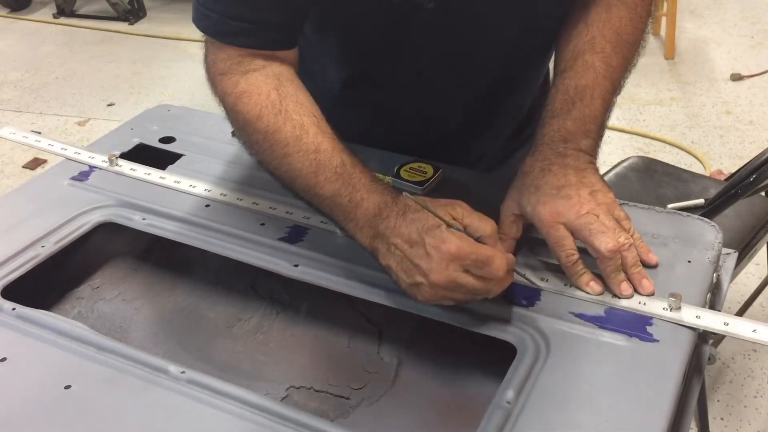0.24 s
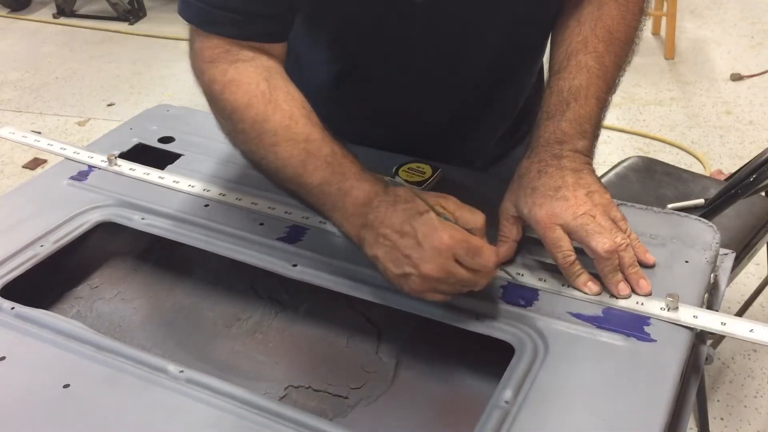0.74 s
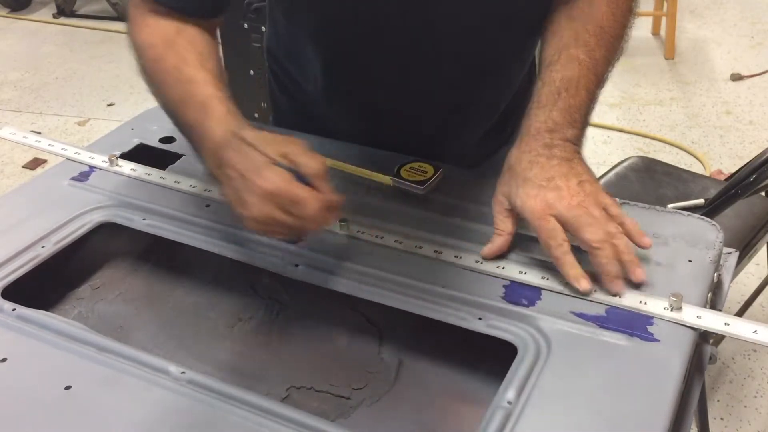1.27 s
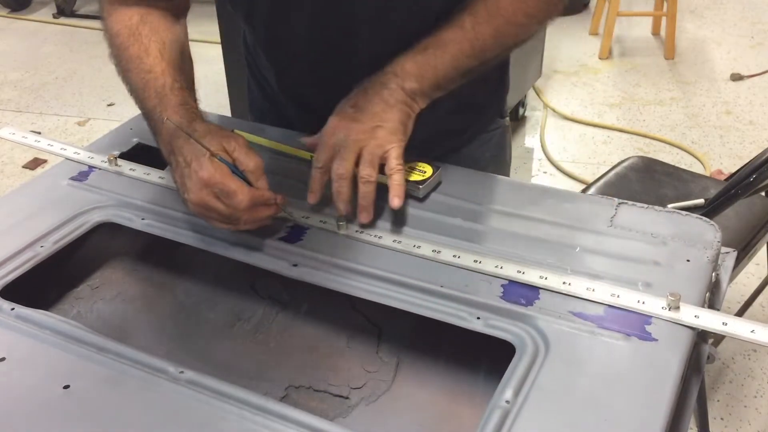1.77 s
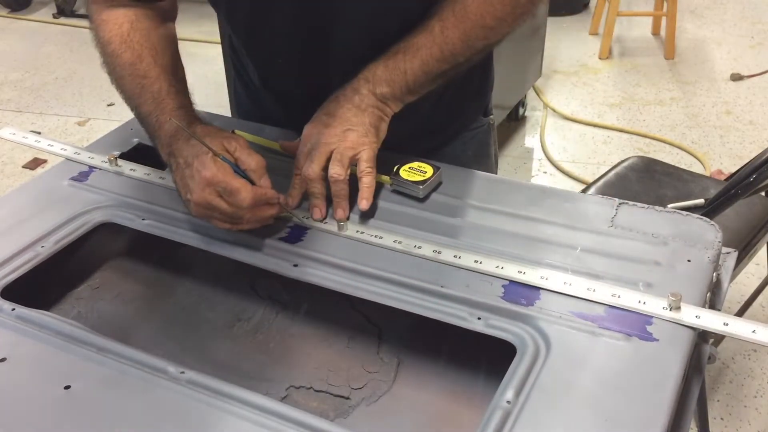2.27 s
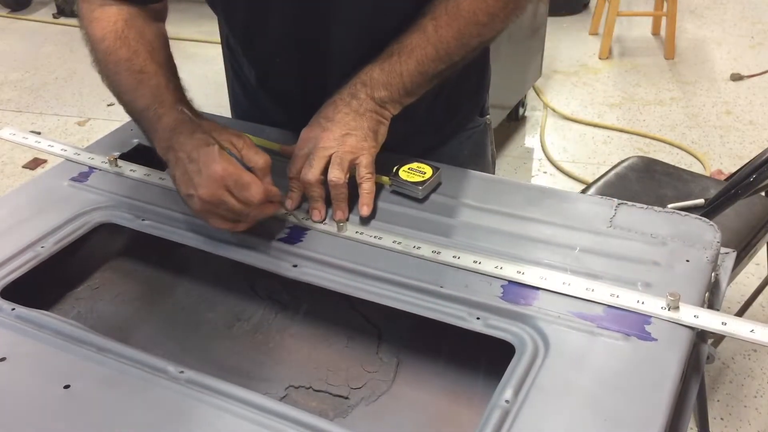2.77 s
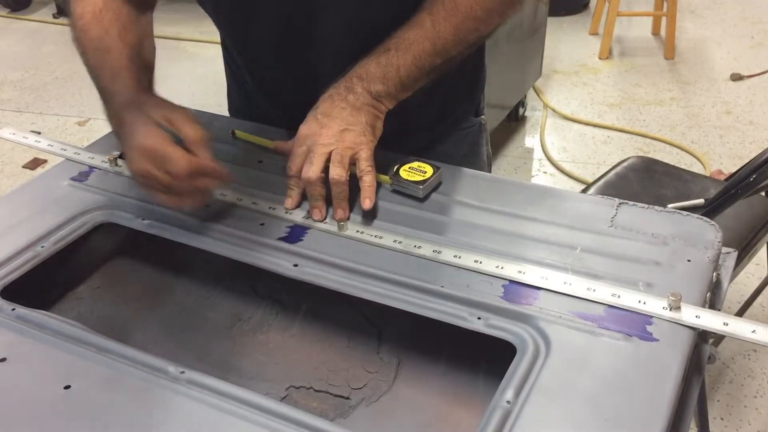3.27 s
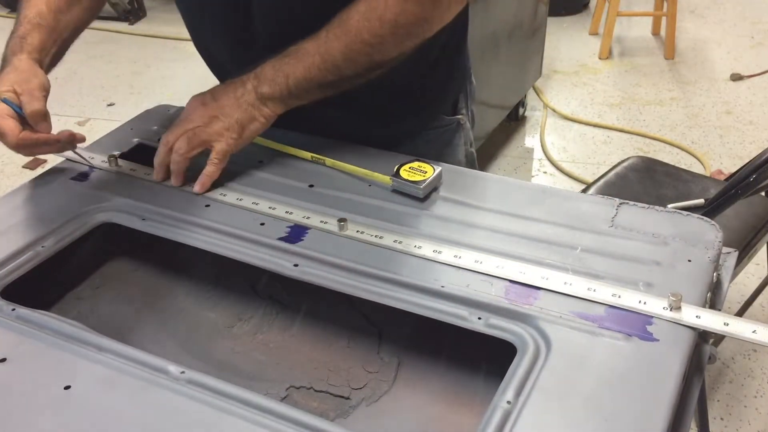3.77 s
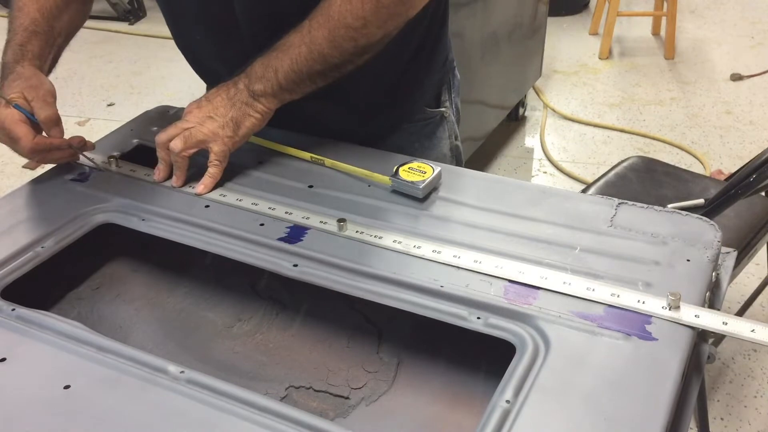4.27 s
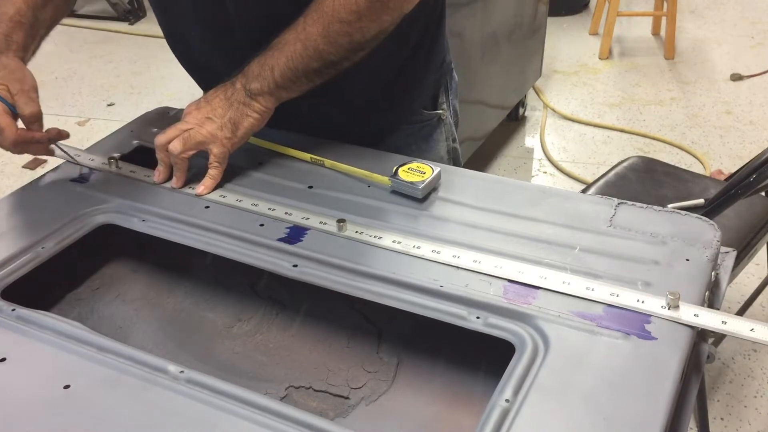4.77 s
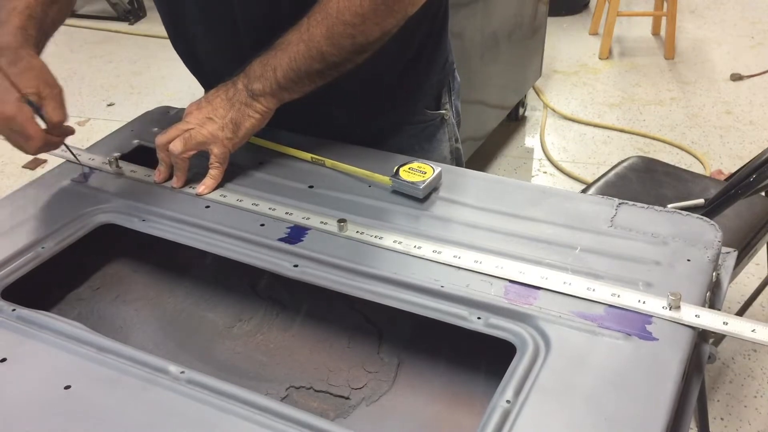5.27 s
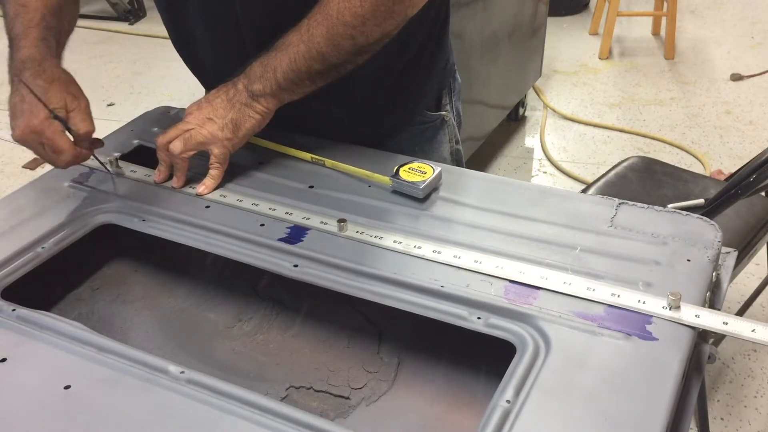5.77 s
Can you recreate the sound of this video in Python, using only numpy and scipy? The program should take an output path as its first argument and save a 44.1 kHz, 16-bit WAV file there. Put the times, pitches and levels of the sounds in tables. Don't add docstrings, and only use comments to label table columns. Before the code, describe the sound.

Close up in a small, quiet workshop, low rumble, faint mains hum and soft air noise run throughout. A tiny dry click comes at the very start, then a faint hand settling near 0.3 s. From 0.67 to 1.15 s a steel tip scrapes along sheet metal, gritty and hollow, rising to a rough peak near 0.85 and thinning out. Small taps follow at 1.3, 1.6 and 2.0 s, with a hand shuffle and light rings to 2.35. A second scrape starts abruptly at 2.82, fading in uneven scratches with low flexing thuds until a firm tap at 3.24. Near-quiet follows, then ringing taps and a shift at 4.0-4.2. A longer, stronger grind swells from 4.58 to 4.92 and stops sharply. At 5.26 the hardest knock rings the panel, leading into quick lighter scratches until 5.75. A last short scrape begins at 5.98.

```python
import sys
import numpy as np
from scipy import signal
from scipy.fft import rfft, irfft
from scipy.io import wavfile
from scipy.ndimage import uniform_filter1d, map_coordinates

SR = 44100
rng = np.random.default_rng(int(sys.argv[2]) if len(sys.argv) > 2 else 0)


def materialize(psi):
    bounded = np.clip(np.atleast_2d(psi).T, -1, 1)
    quanta = np.round(bounded * 32767).astype(np.int16)
    wavfile.write(sys.argv[1], SR, quanta)


def undo_db(level):
    steps = np.asarray(level, float) / 20
    return 10 ** steps


N = 266472


def evened(x):
    return x / np.sqrt(np.mean(x ** 2) + 1e-20)


def read(points, hz):
    f, value = np.transpose(points)
    return np.interp(np.log(hz + 1), np.log(f + 1), value)


def wander(per_s):
    knots = rng.standard_normal(int(N / SR * 400))
    return map_coordinates(knots, [np.arange(N) / SR * min(per_s, 390)], order=1, mode="nearest")


def workshop():
    # hz, level_db [dB per Hz]
    air_spectrum = [(12, -68), (20, -36), (40, -7.5), (65, -0.5), (123, -5), (187, -23.5), (240, -4),
                    (268, -28), (355, -20), (396, -28), (469, -27), (637, -25.5), (1690, -31), (2800, -36),
                    (15800, -47)]
    # hz, level_db
    hum_partials = [(59.5, -63.5), (120, -64.5), (242, -78.5)]
    frames, hz = N // 256 + 5, np.fft.rfftfreq(1024, 1 / SR)
    real, imaginary, patches = rng.standard_normal((frames, 513, 3)).T
    patches = uniform_filter1d(patches, size=12, axis=0)
    patches = evened(uniform_filter1d(patches, size=14, axis=1))
    patches_db = 0.8 * patches / (1 + hz[:, None] / 1300.0)
    z = (real + 1j * imaginary) * undo_db(read(air_spectrum, hz)[:, None] + patches_db)
    air = undo_db(-57.5) * evened(signal.istft(z, nperseg=1024, noverlap=768)[1][:N])
    t = np.arange(N) / SR
    hum = np.zeros(N)
    for f, db in hum_partials:
        strength = undo_db(db + 1.5 + 0.87 * wander(5.6))
        hum += strength * np.sin(2 * np.pi * f * t + 1.9 * wander(5.))
    return air + hum


def rings(modes, t, spread_db=0.):
    hz, db, t60 = np.transpose(modes)[:, :, None]
    db = db + spread_db * rng.standard_normal(db.shape)
    partials = undo_db(db - 60 * t / t60) / np.sqrt(t60) * np.sin(2 * np.pi * hz * t)
    x = partials.sum(axis=0)
    return x / np.linalg.norm(x)


def soft_burst(t):
    return rng.standard_normal(len(t)) * np.exp(-t / 0.0045) * (1 - np.exp(-t / 0.0023))


def clicks():
    # start_s, level_db, pitch_hz, t60_s
    click_events = [
        (.037, -49, 9500, .006),
        (.171, -64, 8000, .002),
        (1.3, -61, 14500, .002),
        (1.314, -63, 12500, .001),
        (1.999, -59, 13500, .003),
        (3.81, -65, 12500, .002),
    ]
    out, t = np.zeros(N), np.arange(4000) / SR
    burst = soft_burst(t)
    for s, db, hz, t60 in click_events:
        click = signal.fftconvolve(burst, rings([(hz, 0, t60)], t))
        out[round(s * SR):][:len(t)] += undo_db(db) * click[:len(t)]
    return out


def body(dry_db, modes_db):
    # hz, level_db, t60_s
    panel_modes = [(210.8, 7, 0.46), (360, 13, 0.67), (464, 2.5, 0.35), (575, 4, 0.46), (627.5, 1, 0.78),
                   (817, -8, 1), (831, 9.5, 0.29), (967, -2, 0.83), (990, -2.5, 1), (1062, 4, 0.36),
                   (1228, 1, 0.31), (1470, -6.5, 0.12), (1840, -30, 0.29), (2220, 1, 0.11),
                   (2474, 12.5, 0.058), (2970, -14, 0.2), (2990, -30, 0.18), (3440, 3, 0.19),
                   (3960, -10, .15), (5430, 5, 0.081), (6450, 5, 0.11)]
    # hz, level_db, t60_s
    rule_modes = [(830, -9.5, 0.17), (1550, 7, 0.012), (2130, -12, 0.21), (3260, -10, 0.14),
                  (3933, 6, 0.023), (5630, 11, 0.016), (6595, 14, 0.02), (9630, 9, 0.0064),
                  (12700, 0, .015)]
    # hz, t60_s
    dense_decay = [(200, 0.94), (530, 0.52), (1400, 0.49), (3700, 0.37), (9700, 0.053)]
    t = np.arange(SR // 2) / SR
    hz, frames, z = signal.stft(rng.standard_normal(len(t)), SR, nperseg=256)
    t60 = read(dense_decay, hz)[:, None]
    decaying = z * undo_db(-60 * frames / t60) / np.sqrt(t60)
    thicket = signal.istft(decaying, SR, nperseg=256)[1][:len(t)]
    thicket *= 1 - np.exp(-t / 0.0013)
    out = thicket / np.linalg.norm(thicket)
    out += undo_db(modes_db) * rings(panel_modes, t, spread_db=2.5)
    out += undo_db(-9.0) * rings(rule_modes, t, spread_db=9.0)
    out[0] += undo_db(dry_db)
    return out * np.cos(np.pi * t) / np.linalg.norm(out)


def panel(jolts, places_per_s=2.5):
    turn = np.pi * places_per_s * np.arange(N) / SR
    out = np.zeros(N)
    for k in range(3):
        share = np.sqrt(2 / 3) * np.cos(turn + k * np.pi / 3)
        out += signal.oaconvolve(jolts * share, body(dry_db=-2.0, modes_db=-12.5))[:N]
    return out


def bands():
    # hz, level_db [dB per Hz]
    colour = [(90, -11), (200, -12), (280, -11), (400, -2.5), (640, -1.5), (900, -4.5), (1400, -5.5),
              (2200, -11), (2900, -10), (4200, -13), (5500, -20), (7500, -28), (10000, -31.5), (15900, -36)]
    split_hz = (75, 500, 1300, 3800)
    hz = np.fft.rfftfreq(4096, 1 / SR)
    above = [1 / (1 + (f / (hz + 1)) ** 6) for f in split_hz] + [0 * hz]
    out = []
    for share in -np.diff(above, axis=0):
        log_gain = np.log(undo_db(read(colour, hz)) * np.sqrt(abs(share)) + 1e-6)
        circle = np.concatenate([log_gain, log_gain[-2:0:-1]])
        response = np.fft.ifft(np.exp(np.conj(signal.hilbert(circle)))).real[:2048]
        out.append(response / np.linalg.norm(response))
    return out


def pull(start, rise, fall):
    lifts_s = [1.151, 3.145, 3.275, 4.923, 5.75, 6.5]
    t = np.arange(N) / SR - start
    after = np.maximum(t - rise, 0) / fall
    lifted_s = np.maximum(t + start - min(s for s in lifts_s if s > start), 0)
    fall_db = -21.5 * after ** 1.61 - 450 * lifted_s
    return np.sin(np.pi / 2 * np.clip(t / rise, 0, 1)) ** 0.66 * undo_db(np.maximum(fall_db, -200))


def slips(per_s, uneven_db):
    size = undo_db(uneven_db * np.minimum(rng.exponential(1, N), 4)) * rng.choice([-1., 1.], N)
    happens = rng.random(N) < per_s / SR
    roughness_db = 2.07 * wander(60.) + 1.2 * wander(250.)
    return evened(size * happens * undo_db(roughness_db))


def resonate(x, hz, width_hz):
    turn = np.exp(2j * np.pi * np.cumsum(hz) / SR)
    r = np.exp(-np.pi * width_hz / SR)
    return 2 * (turn * signal.lfilter([1 - r], [1, -r], x / turn)).real


def scratch(filters):
    # start_s, rise_s, fall_s, force_db, speed [0-1]
    shifts = [
        (.29, 0.04, .06, -65, 0.44),
        (2.0, 0.0091, 0.024, -52.5, 0.56),
        (2.14, 0.023, .06, -63.5, 0.79),
        (2.26, 0.032, 0.12, -65.5, 0.4),
        (2.33, 0.015, 0.041, -65.5, 0.5),
        (4.005, 0.0043, 0.035, -51.5, 0.36),
        (4.13, .05, 0.058, -67.5, 0.42),
        (4.19, 0.021, 0.04, -63.5, 0),
    ]
    # start_s, rise_s, fall_s, force_db, speed [0-1]
    pulls = [(.667, 0.0087, 0.29, -41, 0.25), (.775, 0.078, 0.054, -25, 0.17),
             (.87, 0.091, 0.16, -36, 0.99), (1.03, 0.026, 0.17, -39.5, 0.65),
             (2.821, 0.0034, 0.023, -41.5, 0.66), (2.822, 0.0082, 0.14, -26.5, .1),
             (2.955, 0.026, 0.083, -37, 0.53), (3.005, 0.039, 0.098, -40, 0.33),
             (3.065, 0.044, 0.044, -42, 0.6), (3.105, 0.022, .06, -36, 0.06),
             (3.228, 0.0083, 0.036, -44, 0.55), (4.578, 0.0065, 0.048, -39.5, 0.24),
             (4.585, 0.074, 0.1, -37, 0.39), (4.68, 0.14, 0.24, -27, 0.24),
             (4.77, 0.07, 0.078, -24.5, 0.22), (4.84, 0.046, 0.016, -28.5, 0.2),
             (5.256, .007, 0.065, -19.5, 0.34), (5.275, 0.0087, 0.086, -34, 0.73),
             (5.372, 0.042, .075, -38, 0.92), (5.4, 0.022, 0.097, -35.5, 0.8),
             (5.495, 0.054, 0.027, -36.5, 0.87), (5.56, 0.061, 0.12, -38.5, .3),
             (5.982, 0.0032, 0.037, -42, 0.2), (5.99, 0.053, 0.071, -30.5, 0.54)]
    # slow_db, fast_db
    tip_law = [(-6, -4), (-7.5, 8), (-21.5, 4.5)]
    # slow_db, fast_db
    hand_law = [(6, -8), (-13, 9), (-31, -26)]
    # from_s, grind_hz, fast_chatter_hz, boom_db, focus_db
    marks = [
        (0, 940, 2210, 3, 3.5),
        (1.5, 830, 1760, 4, 5.5),
        (3.2, 905, 1550, -2, 7.5),
        (4.4, 860, 2110, 0.5, 0.5),
        (5.2, 947, 1440, -3, 5.6),
        (5.55, 990, 1440, 1, 2.5),
        (5.9, 1030, 1340, 1.5, -1),
    ]
    follow = np.array([[.85], [1], [1.05], [1.15]])
    slow_chatter_hz = 1550
    from_s, grind_hz, fast_hz, mark_db, focus_db = np.transpose(marks)
    mark = np.searchsorted(from_s, np.arange(N) / SR, side="right") - 1
    power, pace = np.zeros((4, N)), np.zeros(N)
    for rows, law in ((pulls, tip_law), (shifts, hand_law)):
        for start, rise, fall, force_db, speed in rows:
            boom_db, chatter_db, hiss_db = (slow + (fast - slow) * speed for slow, fast in law)
            band_db = force_db + np.array([[boom_db], [0], [chatter_db], [hiss_db]])
            part = (pull(start, rise, fall) ** follow * undo_db(band_db)) ** 2
            power += part
            pace += part[2] * speed
    mean_speed = pace / (power[2] + 1e-20)
    chatter_hz = slow_chatter_hz + (fast_hz[mark] - slow_chatter_hz) * mean_speed
    jolts = slips(per_s=5000., uneven_db=2.5)
    gains = np.sqrt(power)
    boom, middle, chatter, hiss = (signal.oaconvolve(jolts * g, f)[:N] for g, f in zip(gains, filters))
    focus = undo_db(-2.5) * resonate(middle, grind_hz[mark], width_hz=403.0)
    focus += undo_db(-2.5) * resonate(chatter, chatter_hz, width_hz=700.0)
    broad = undo_db(mark_db[mark]) * boom + 0.67 * middle + 0.46 * chatter
    return broad + undo_db(focus_db[mark]) * focus + hiss


def thuds():
    # start_s, peak_db, pitch_hz
    flexes = [(0.348, -51, 252), (1.087, -34.5, 241.6), (1.2, -46, 357), (1.26, -52, 247.6),
              (2.022, -45.5, 191), (2.99, -35, 149), (3.029, -27, 362), (4.059, -40, 197),
              (4.164, -42.5, 177), (4.23, -46.5, 355), (4.649, -25.5, 352), (4.921, -30, 197),
              (5.63, -51, 312)]
    # start_s, level_db, pitch_hz, t60_s
    pings = [(.31, -53.5, 708, 0.18), (2.008, -52, 825, 0.075), (2.164, -49, 1550, 0.14),
             (2.175, -57, 1840, 0.12), (2.28, -62, 1486, 0.22), (2.345, -56.5, 794, 0.2),
             (3.251, -42, 1407, 0.12), (4.008, -44.5, 1510, 0.064), (4.012, -52, 830, 0.14),
             (4.119, -51, 1495, 0.071), (5.265, -19.5, 928, 0.16)]
    out, t = np.zeros(N), np.arange(SR // 3) / SR
    for s, db, hz, t60 in [(s, db - 4.0, hz, .3) for s, db, hz in flexes] + pings:
        envelope = undo_db(db - 60 * t / t60) * (1 - np.exp(-t * hz / 0.53))
        out[round(s * SR):][:len(t)] += envelope * np.sin(2 * np.pi * hz * t)
    return out


def taps(filters):
    # start_s, panel_db, lower_ring_db, upper_ring_db, tick_db
    tap_events = [
        (1.31, -49, -66, -75.5, -73),
        (1.594, -57, -80, -82, -89),
        (1.999, -48.5, -78, -57.5, -77),
        (2.163, -61, -56.5, -59, -74),
        (3.236, -36.5, -50, -58, -75),
        (3.809, -62, -86, -88, -85),
        (4.007, -43.5, -47, -56.5, -83),
        (4.12, -53, -65, -54, -90),
        (5.256, -16.5, -56, -42, -59),
    ]
    # hz, level_db, t60_s
    scribe_modes = [
        [(2784, -32, 0.053), (3990, -11, 0.065)],
        [(5585, -13, 0.019), (7220, -29, .05)],
    ]
    knock, ring, t = np.zeros(N + 4000), np.zeros(N + 4000), np.arange(4000) / SR
    lower, upper = (rings(pair, t) for pair in scribe_modes)
    low_filter = filters[1] + filters[2] + 0.21 * filters[3]
    tick_filter = np.gradient(np.gradient(filters[3]))
    for s, panel_db, lower_db, upper_db, tick_db in tap_events:
        burst = soft_burst(t)[:1000]
        low = signal.fftconvolve(burst, low_filter)
        tick = signal.fftconvolve(burst, tick_filter)
        tone = signal.fftconvolve(burst, undo_db(lower_db + 4.5) * lower + undo_db(upper_db + 6.5) * upper)
        at = round(s * SR)
        knock[at:at + len(low)] += undo_db(panel_db + 6) * low + undo_db(tick_db - 9.0) * tick
        ring[at:at + len(t)] += tone[:len(t)]
    return knock[:N], ring[:N]


def scene():
    # time_s, ring_db
    mute = [
        (3.35, -3.5),
        (3.39, -11),
        (3.7, -9),
        (3.75, -0.5),
        (5.76, -5),
        (5.8, -18),
        (5.96, -7),
        (5.98, 0),
    ]
    filters = bands()
    knock, ring = taps(filters)
    ring = ring + clicks()
    still = undo_db(np.interp(np.arange(N) / SR, *np.transpose(mute)))
    through_panel = panel(scratch(filters) + knock + undo_db(-17.5) * ring)
    return (still * through_panel + ring + thuds() + workshop())[None]


def low_pass(x):
    return signal.sosfilt(signal.butter(12, 15940, fs=SR, output="sos"), x)


def record(dry):
    # centre_hz, width_hz, depth [0-1]
    notches = [(4810, 280, 0.28), (10500, 360, 0.45)]
    hz = np.fft.rfftfreq(N, 1 / SR)
    gain = 1 / np.sqrt(1 + (57.0 / (hz + 1)) ** 6)
    for centre_hz, width_hz, depth in notches:
        gain = gain * (1 - depth / (1 + (2 * (hz - centre_hz) / width_hz) ** 2))
    mix = irfft(rfft(dry) * gain, N)
    return low_pass(mix)


dry = scene()
out = record(dry)
materialize(out)
```